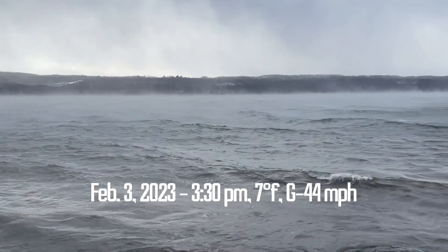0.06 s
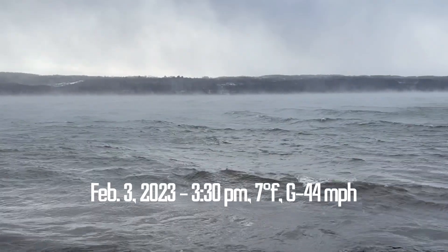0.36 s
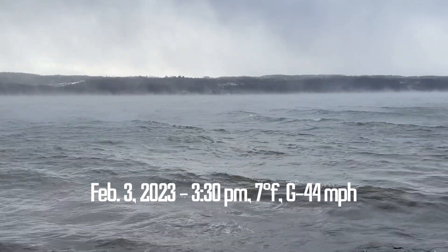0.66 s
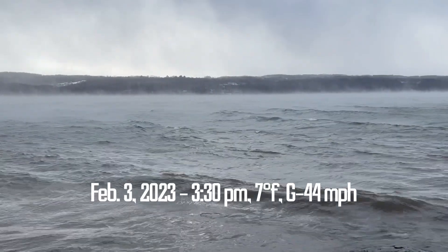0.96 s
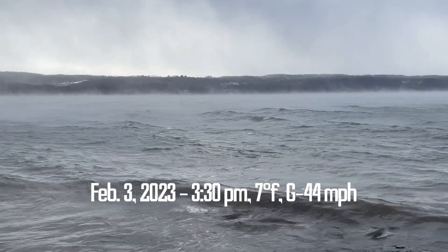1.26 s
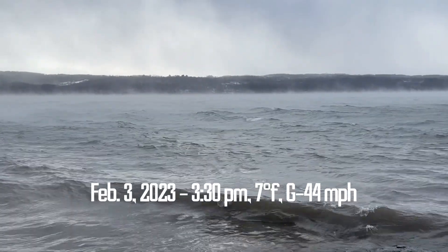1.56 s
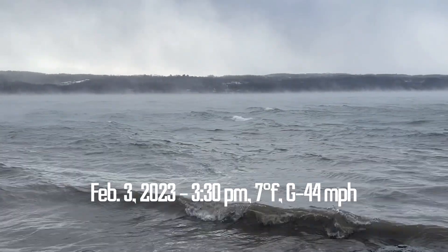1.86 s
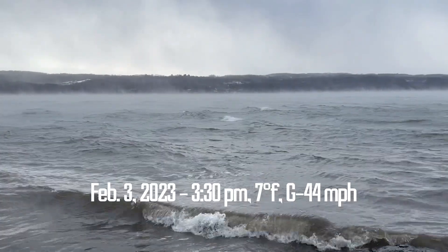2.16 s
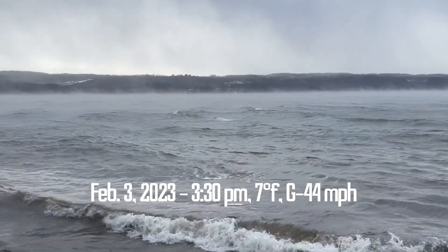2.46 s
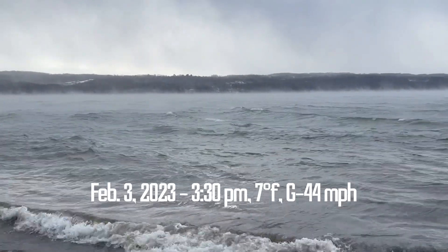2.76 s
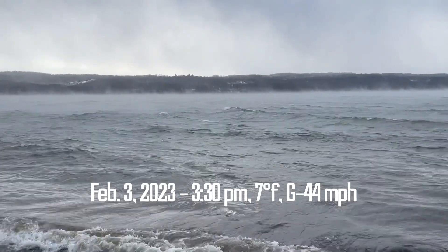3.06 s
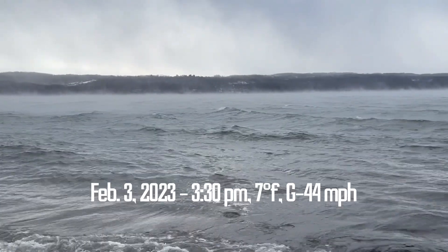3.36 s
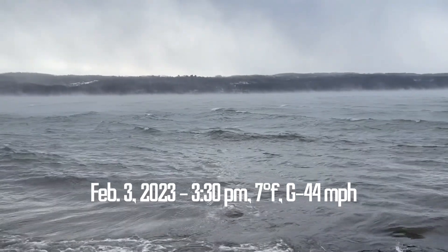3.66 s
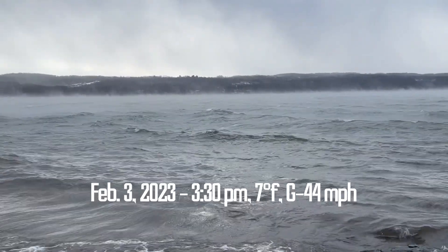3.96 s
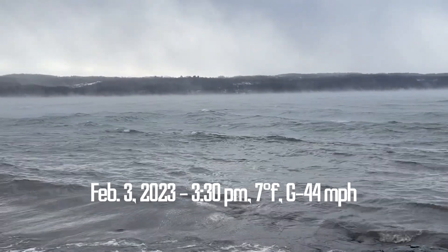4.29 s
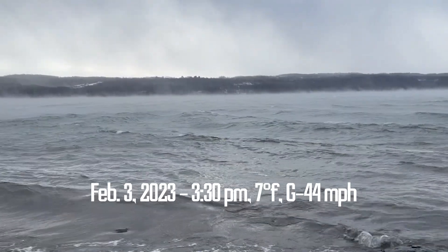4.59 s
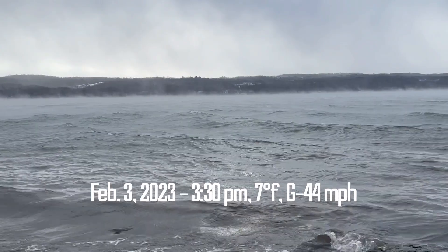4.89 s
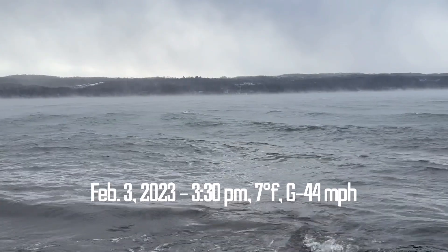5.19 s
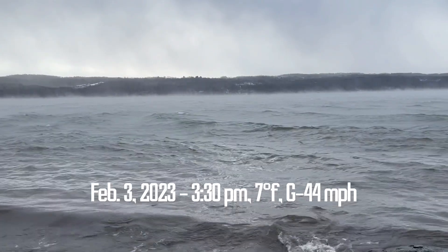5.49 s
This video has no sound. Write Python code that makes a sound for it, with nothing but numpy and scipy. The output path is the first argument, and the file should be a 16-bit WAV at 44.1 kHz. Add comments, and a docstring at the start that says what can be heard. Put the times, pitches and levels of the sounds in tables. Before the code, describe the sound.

Strong gusts hit a microphone at the edge of a lake, making an uneven low rumble with flapping thuds. Ahead, small waves splash and churn continuously, with occasional nearby plops and spatters of spray. One larger wave breaks after about two seconds and spreads into hissing foam. The wind drops for a moment, then returns over a low, gurgling backwash.

```python
"""Gale on a lake shore

A small two-port microphone faces choppy water that roars, bubbles and fizzes. One wave breaks on the
shore at about two seconds and runs out as foam. Close by, air pockets plop and spray patters back,
while the wind's eddies rumble and thump on the microphone itself."""
import sys
import numpy as np
from scipy import signal
from scipy.fft import rfft, irfft
from scipy.io import wavfile
from scipy.ndimage import uniform_filter1d

SR = 44100
rng = np.random.default_rng(int(sys.argv[2]) if len(sys.argv) > 2 else 0)


def transcribe(signal):
    """Save signal, clipped to [-1, 1], as a 16-bit WAV file at the path in sys.argv[1]."""
    frames = np.atleast_2d(signal).T
    limited = np.clip(frames, -1, 1)
    pcm = np.round(limited * 32767).astype(np.int16)
    wavfile.write(sys.argv[1], SR, pcm)


N = 243998


def gain_of(db):
    """Decibels to gain."""
    return 10 ** (np.asarray(db) / 20)


def unit_rms(x):
    """Scales to rms 1."""
    return x / np.sqrt(np.mean(x ** 2) + 1e-20)


def curve_at(points, hz):
    """Reads a spectrum table on a log-frequency axis."""
    f, value = np.transpose(points)
    return np.interp(np.log(hz + 1), np.log(f + 1), value)


def add(mix, start_s, sound):
    """Mixes a sound in at start_s."""
    part = mix[max(round(start_s * SR), 0):][:len(sound)]
    part += sound[:len(part)]


def spectra(x):
    """Short-time spectra: Hz, seconds, bins x frames."""
    return signal.stft(x, SR, nperseg=512, noverlap=384)


def drift(shape, bins, frames):
    """Noise smoothed over frequency and time."""
    across_bins = uniform_filter1d(rng.standard_normal(shape), bins, 0)
    return unit_rms(uniform_filter1d(across_bins, frames, 1))


def bubble(hz, cycles, rise=0.0438):
    """A trapped bubble rings for some cycles, its pitch rising as it nears the surface."""
    turns = np.arange(int(5 * cycles * SR / hz)) * hz / SR
    tone = np.sin(2 * np.pi * turns * (1 + rise * turns / cycles))
    return tone * np.exp(-turns / cycles) * (1 - np.exp(-turns))


def bubble_swarm(density=2600, spread_db=2.5, pitches=48):
    """Bubbles of all sizes near the microphone, a few of them loud; equal power per Hz."""
    out = np.zeros(N)
    for hz in np.geomspace(380, 15000, pitches):
        strength = gain_of(spread_db * np.minimum(rng.exponential(1, N), 4.5))
        per_s = density / pitches * np.sqrt(hz / 2000)
        births = strength * (rng.random(N) < per_s / SR)
        out += np.sqrt(hz) * unit_rms(signal.oaconvolve(births, bubble(hz, cycles=4.45))[:N])
    return unit_rms(out)


# The big wave on the shore and the small ones around it: crest_s, splash_db, foam_db, build_s, run_out_s
WAVES = [(.13, -36.5, -39, .26, 0.34), (.72, -42.5, -51.5, 0.2, 0.14), (1.13, -37, -41.5, 0.11, 0.16),
         (1.38, -41.5, -41.5, 0.085, 1), (1.72, -42, -44.5, 0.039, 0.56), (1.98, -37, -43, 0.071, .2),
         (2.2, -32.5, -37.5, 0.15, 1), (2.42, -36.5, -43, 0.15, 0.75), (2.72, -36.5, -42, 0.072, 0.14),
         (3.08, -37, -40.3, 0.052, 0.39), (3.48, -38, -42.5, 0.043, 0.42), (3.93, -37.6, -40.4, 0.14, 0.75),
         (4.62, -46.5, -49, 0.37, 0.55), (5.07, -44.5, -38.5, 0.27, 0.16), (5.45, -59, -47, 0.077, 0.32)]

def surf(t, chop_db=-39.5, chop_foam_db=-43, roar_above_db=3.5, roar_growth=0.85):
    """Relative dB of roar, splash and foam: each wave builds, then runs out over the steady chop."""
    splash_power, foam_power = gain_of(chop_db) ** 2, gain_of(chop_foam_db) ** 2
    for crest_s, splash_db, foam_db, build_s, run_out_s in WAVES:
        before, after = np.minimum(t - crest_s, 0), np.maximum(t - crest_s, 0)
        swell = np.exp(-(before / build_s) ** 2 / 2 - after / run_out_s)
        splash_power += (gain_of(splash_db) * swell) ** 2
        foam_power += (gain_of(foam_db) * swell) ** 2
    splash, foam = 10 * np.log10(splash_power), 10 * np.log10(foam_power)
    roar = chop_db + roar_above_db + roar_growth * (splash - chop_db)
    return roar, splash, foam


# Air trapped in backwash and toppling crests: centre_s, swell_db, half_length_s, pitch_hz
AIR_CLOUDS = [(0, 4.5, 0.048, 300), (1.402, 8, 0.56, 245), (2.3, 2.5, 0.35, 520), (2.302, 0.7, 0.17, 1100),
              (2.95, 5, 0.34, 304), (3.45, 2, 0.26, 1050), (4.515, 9.5, 0.46, 310), (4.98, 2.5, 0.18, 590)]

def slosh(t, hz, spread_octaves=0.87):
    """Each cloud of like-sized air pockets swells the roar around its own pitch, in dB."""
    db = -4.5 * curve_at([(380, 0.7), (750, 0.074)], hz)  # the low roar sinks between backwashes
    for centre_s, swell_db, half_s, pitch_hz in AIR_CLOUDS:
        octaves = np.log2((hz + 1) / pitch_hz)
        db = db + swell_db * np.exp(-((t - centre_s) / half_s) ** 2 - (octaves / spread_octaves) ** 2)
    return db


# How alike the water sounds left and right: frequency_hz, coherence_ratio
COHERENCE = [(350, 0.92), (750, 0.56), (1400, 0.42), (2000, 1), (4000, 0.81), (5900, 0.98), (6800, 0.92),
             (8500, 1), (10000, 1.0), (11700, 1), (13300, 1), (15000, 0.72)]
# Phase of the left channel ahead of the right, giving the water its stereo spread: frequency_hz, lead_rad
LEFT_LEAD = [(100, 0.1), (1200, 0.1), (1550, -0.6), (2200, 0.0), (3400, 0.7), (5000, 0.4), (5850, -0.5),
             (6500, -0.0), (7450, -0.0), (8400, -1.0), (9650, -3.1), (10400, -3.2), (12700, -6.2),
             (14200, -6.4), (15500, -8.3)]
# Level of the left channel over the right: frequency_hz, level_db
LEFT_BALANCE = [(1000, -0.0), (1400, 2.5), (1800, 0), (3000, 0.1), (4400, 1), (6000, -0.74)]

def stereo_spread(front, around, hz):
    """Sound from the front is common to both channels; sound from all around tells them apart."""
    coherence = curve_at(COHERENCE, hz)
    mid, side = np.sqrt((1 + coherence) / 2) * front, np.sqrt((1 - coherence) / 2) * around
    skew = np.sqrt(gain_of(curve_at(LEFT_BALANCE, hz))) * np.exp(1j * curve_at(LEFT_LEAD, hz) / 2)
    return np.array([(mid + side) * skew, (mid - side) / skew])


# Tone of the lake, heard from the shore: frequency_hz, relative_db
WATER_SPECTRUM = [(100, -6.5), (280, -2.5), (570, -0.5), (800, -3.5), (1100, -4), (1550, -9), (2900, -13),
                  (4000, -15.5), (5700, -17.5), (7500, -16), (9800, -18), (11200, -18), (12600, -26),
                  (15500, -23)]
# Share of near bubbles in the water sound: frequency_hz, power_ratio
NEAR_SHARE = [(400, 0.26), (1200, 0.28), (3000, 0.09), (6000, 0.15), (12000, 0.15)]

def water(roar_trim_db=17.5, splash_trim_db=20, foam_trim_db=21.5, fizz_growth=0.25):
    """Near bubbles over the wash of far waves: churning drives the lows, crests the mids, foam the top."""
    hz, t, near = spectra(np.array([bubble_swarm(), bubble_swarm()]))
    hz = hz[:, None]
    far = spectra(rng.standard_normal((2, N)))[2]
    share = curve_at(NEAR_SHARE, hz)
    front, around = np.sqrt(share) * near + np.sqrt(1 - share) * far
    roar, splash, foam = surf(t)
    low = curve_at([(1100, 0.73), (1700, 0.013)], hz)
    high = curve_at([(3000, 0.058), (6000, 0.88)], hz)
    db = low * (roar + roar_trim_db) + high * (foam + foam_trim_db)
    db += (1 - low - high) * (splash + splash_trim_db)
    db += curve_at(WATER_SPECTRUM, hz) + slosh(t, hz)
    # thick foam is brighter
    db += fizz_growth * curve_at([(8000, 0), (12000, 1)], hz) * (foam - foam.mean())
    # clouds of like-sized bubbles come and go
    db += 0.8 * drift(db.shape, bins=4, frames=12) + 0.38 * drift(db.shape, bins=110, frames=12)
    heard = stereo_spread(front, around, hz) * gain_of(db)
    return signal.istft(heard, SR, nperseg=512, noverlap=384)[1][:, :N]


def eddy(hz, cycles=1.0, settle_hz=34, rise=0.37, tail=0.46, ring_s=0.00032):
    """A pressure kick through the microphone's low cut: the bass lags, so the thump falls in pitch."""
    peak_s = cycles / max(hz - settle_hz, 50)
    t = np.arange(1, SR // 14) / SR
    log_age = np.log(t / peak_s)
    width = np.where(log_age < 0, rise, tail + np.log(1 + ring_s / peak_s))
    envelope = np.exp(-0.5 * (log_age / width) ** 2) * (1 - (t / t[-1]) ** 2)
    turns = cycles * log_age + settle_hz * t + rng.random()
    return peak_s, envelope * np.cos(2 * np.pi * turns)


# Strength of the wind on the microphone: time_s, level_db
GUSTS = [(0, -31), (.26, -39.5), (.55, -42.5), (.82, -47), (1.1, -37), (1.22, -33.5), (1.48, -30),
         (1.74, -37.5), (2.08, -31), (2.58, -29.5), (2.72, -33), (3.02, -30), (3.13, -42), (3.22, -30.5),
         (3.5, -33), (3.78, -38), (4.18, -45.5), (4.52, -33.5), (4.85, -34), (5.1, -34.5), (5.53, -39)]
# Tone of the rumble at the ports: frequency_hz, relative_db
RUMBLE_SPECTRUM = [(20, -33), (35, -13.5), (55, -1), (72, -5), (88, -1.5), (115, -9), (200, -12),
                   (320, -11), (600, -73), (1500, -83)]

def wind(mid_db=0.5, side_db=-13, flutter_db=-4.5, lumpy_db=2.5, uneven_db=8, eddies=1100):
    """Turbulence on the microphone: a lumpy rumble and a flutter of small eddies, riding the gusts."""
    hz = np.fft.rfftfreq(N, 1 / SR)
    lumps = unit_rms(irfft(rfft(rng.standard_normal(N)) * np.exp(-(hz / 35) ** 2), N))
    noise = irfft(rfft(rng.standard_normal((2, N))) * gain_of(curve_at(RUMBLE_SPECTRUM, hz)), N)
    mid, side = unit_rms(noise * gain_of(lumpy_db * lumps))
    mid, side = gain_of(mid_db) * mid, gain_of(side_db) * side
    flutter = np.zeros((2, N))
    for when, size, pitch, pan in rng.random((eddies, 4)):
        thump = gain_of(uneven_db * size) * eddy(hz=130 * 2 ** (2.035 * pitch), tail=0.51)[1]
        # a small eddy presses harder on one port than on the other
        add(flutter[0], when * N / SR, 2 * pan * thump)
        add(flutter[1], when * N / SR, 2 * (1 - pan) * thump)
    air = np.array([mid + side, mid - side]) + gain_of(flutter_db) * unit_rms(flutter)
    gust_db = np.interp(np.arange(N) / SR, *np.transpose(GUSTS))
    return air * gain_of(gust_db)


# The strongest eddies to hit the microphone: peak_s, level_db, pitch_hz, tail_ratio
# A short tail is a flap, a long one a round thud.
BUFFETS = [(.005, -16.5, 300, 0.38), (0.152, -21, 230, 0.59), (.204, -13, 560, 0.62),
           (0.211, -19, 200, .35), (0.223, -24, 220, 0.37), (0.299, -24, 80, 0.48), (0.668, -23.5, 92, .4),
           (1.272, -16.5, 124, 0.62), (1.327, -30, 160, .4), (1.347, -24, 300, .4), (1.421, -20.5, 124, .4),
           (1.437, -19, 540, 0.35), (1.485, -20, 130, 0.6), (1.574, -18, 278, 0.33),
           (1.634, -16, 205, 0.36), (1.669, -26, 200, 0.3), (1.820, -21, 160, 0.32), (1.83, -22, 90, 0.26),
           (1.856, -16.5, 450, 0.44), (1.917, -16.5, 250, 0.48), (2.082, -24, 99, .4),
           (2.099, -15.5, 473, 0.26), (2.125, -21, 180, 0.59), (2.191, -10.5, 211, 0.83),
           (2.211, -22, 86, 0.29), (2.373, -20, 105, 0.39), (2.490, -25, 107, .43), (2.555, -15, 110, 0.58),
           (2.566, -23, 200, .5), (2.594, -14.5, 278, 0.43), (2.604, -16.5, 100, 0.4),
           (2.643, -22, 104, .4), (2.765, -18.5, 238, 0.31), (2.787, -16.5, 109, 0.31),
           (2.840, -16.5, 200, .5), (2.925, -18, 302, .43), (2.982, -20.5, 170, 0.48),
           (3.037, -15, 397, 0.29), (3.047, -16.5, 87.5, 0.44), (3.242, -14, 280, 0.28),
           (3.257, -16.5, 216, 0.87), (3.279, -20.5, 388, 0.43), (3.395, -15, 427, 0.25),
           (3.456, -19.5, 259, 0.45), (3.491, -13, 420, .48), (3.595, -19.5, 117, 0.37),
           (4.532, -17, 190, 0.52), (4.545, -25, 130, 0.31), (4.638, -9.5, 368, 0.33),
           (4.653, -22, 100, .38), (4.793, -22, 440, 0.43), (4.801, -15.5, 200, .33),
           (4.825, -27, 106, 0.64), (4.85, -27, 190, 0.38), (4.865, -28, 130, 0.3), (5.058, -25, 280, 0.46),
           (5.072, -22, 170, .4), (5.301, -21, 220, .35), (5.333, -20, 284, 0.45)]

def buffets(ring_growth=0.21, shreds=3, scatter_s=0.028, shred_lowest_hz=174):
    """Each big eddy thumps once, amid weaker shreds; the higher its pitch, the more cycles it rings."""
    out = np.zeros(N)
    for peak_s, db, hz, tail in BUFFETS:
        rise_s, thump = eddy(hz, cycles=1.2 * (hz / 200) ** ring_growth, tail=tail)
        add(out, peak_s - rise_s, gain_of(db) * thump)
        shred_db = min(db, -14) - 12
        for when, pitch in rng.random((shreds, 2)):
            shred = eddy(shred_lowest_hz * 3 ** pitch)[1]
            add(out, peak_s + scatter_s * (2 * when - 1), gain_of(shred_db) * shred)
    return out


# Single large bubbles and slaps of spray, close by: start_s, level_db, pitch_hz
PLOPS = [(.124, -23, 2940), (.152, -20, 2740), (.526, -21, 505), (.544, -24, 694), (3.095, -22, 593),
         (3.176, -20, 570), (4.203, -22, 580)]

def plops():
    """Pockets of air close in the nearby chop and ring briefly."""
    out = np.zeros(N)
    for start_s, db, hz in PLOPS:
        add(out, start_s, gain_of(db) * bubble(hz, cycles=3.9))
    return out


# Showers landing on the lake: centre_s, level_db, pitch_hz, half_length_s
SHOWERS = [(0.77, -43, 2600, 0.018), (1.021, -34, 1150, .018), (1.183, -43, 3600, 0.029),
           (1.364, -41, 2760, 0.017), (1.737, -42, 4200, 0.031)]

def spray(spread_octaves=0.367, spread_db=2.4, drops=160):
    """Spray thrown off a crest patters back as drops of like size, each a short ping."""
    out = np.zeros(N)
    for centre_s, db, hz, half_s in SHOWERS:
        shower = np.zeros(N)
        for when, pitch, size in np.clip(rng.standard_normal((drops, 3)), -2, 2):
            ping = bubble(hz * 2 ** (spread_octaves * pitch), cycles=4)
            add(shower, centre_s + half_s * when, gain_of(spread_db * size) * ping)
        time_share = 2 * half_s * SR / N
        out += gain_of(db) * unit_rms(shower) * np.sqrt(time_share)
    return out


def scene():
    """Water ahead, wind on the microphone."""
    return water() + plops() + spray() + wind() + buffets()


def record(dry):
    """The microphone's low cut at 31 Hz, then a band limit at 15750 Hz."""
    low_cut = signal.butter(3, 31, "highpass", fs=SR, output="sos")
    band_limit = signal.firwin(511, 15750, window=("kaiser", 9), fs=SR)
    return signal.oaconvolve(signal.sosfilt(low_cut, dry), band_limit[None], "same")


dry = scene()
out = record(dry)
transcribe(out)
```